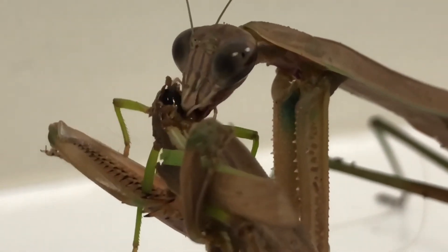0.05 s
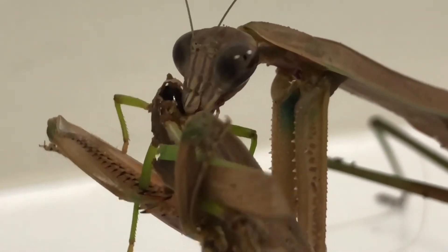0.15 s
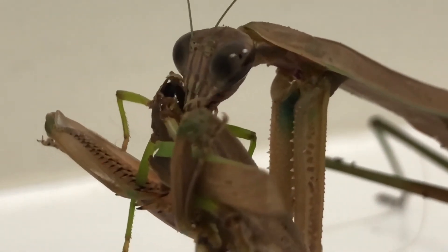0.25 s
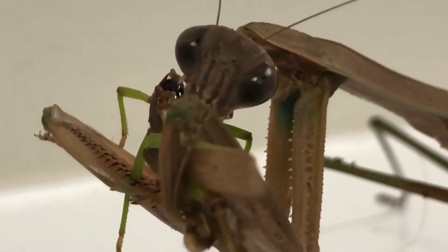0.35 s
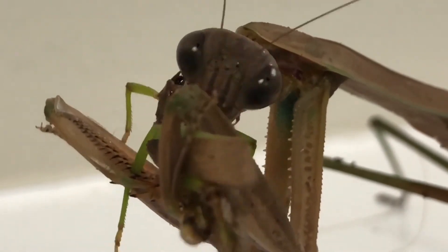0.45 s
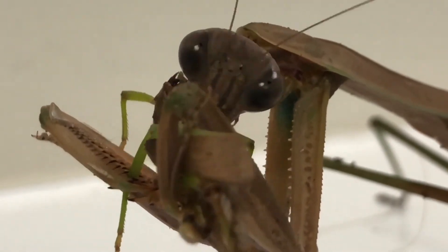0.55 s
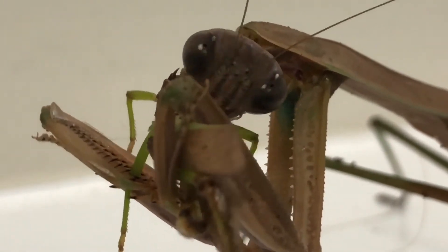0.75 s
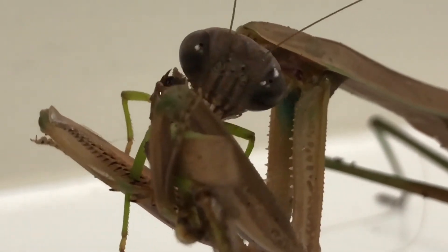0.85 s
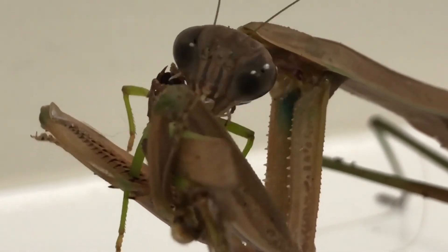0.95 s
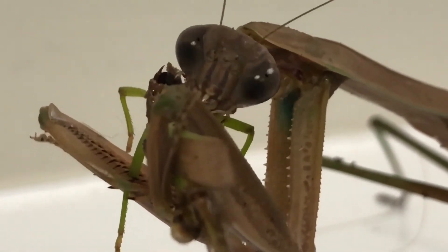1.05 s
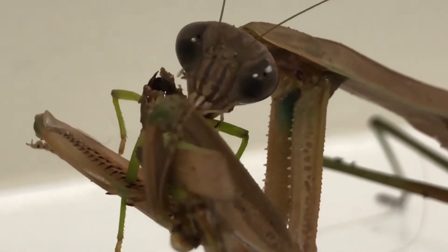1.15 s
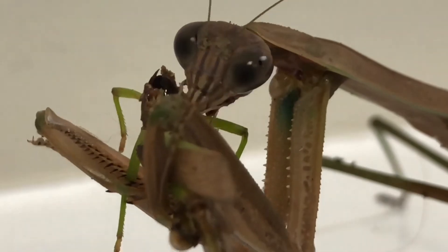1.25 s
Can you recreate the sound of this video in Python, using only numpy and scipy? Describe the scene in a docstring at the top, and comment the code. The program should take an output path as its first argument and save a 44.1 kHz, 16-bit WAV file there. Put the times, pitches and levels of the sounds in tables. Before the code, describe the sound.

An insect's shell crunches and cracks sharply as a mantis bites it, then faint clicks.

```python
"""A mantis bites into a grasshopper, close by, in a small hard-walled enclosure.
Under the jaws the shell crunches in swarms of tiny snaps, then gives way in one sharp crack that
excites its resonances. Legs and shell tap as damped oscillators, and thin snips of the jaws follow.
Reflections from the walls ring on briefly; a faint electric whine and hiss lie underneath."""
import sys
import numpy as np
from scipy import signal
from scipy.fft import rfft, irfft, next_fast_len
from scipy.io import wavfile
from scipy.ndimage import map_coordinates

SR = 44100
rng = np.random.default_rng(int(sys.argv[2]) if len(sys.argv) > 2 else 0)


def file_out(sig):
    """Save sig as 16-bit WAV at sys.argv[1]."""
    # one column per channel
    cols = np.atleast_2d(sig).T
    # limit, then scale
    lim = np.clip(cols, -1, 1)
    pcm = np.round(lim * 32767).astype(np.int16)
    wavfile.write(sys.argv[1], SR, pcm)


N = 57330

# partials of the electric whine (frequency [Hz], rms level [dB])
WHINE_PARTIALS = [(473.7, -80.5), (958.2, -73.5), (1427, -66.5), (1922, -71), (2379, -74.5), (2853, -75.5),
                  (3806, -75), (4280, -91.5), (8646, -93.5), (9604, -98.5), (10567, -98), (11526, -84.5)]
# spectrum of the hiss (frequency [Hz], relative level [dB])
HISS_SPECTRUM = [(100, -9.5), (300, -5), (420, -3.5), (700, -4.5), (1200, 1), (1700, -2.5), (3200, 0.5),
                 (4300, -5.5), (6000, -11), (10000, -15), (15500, -16)]
# spells of crunching (time [s], duration [s], level [dB], treble gain [dB])
CRUNCH_SPELLS = [(0, 0.028, -57.5, -1), (0.06, 0.011, -54, 3.5), (0.078, .03, -60.5, 1),
                 (0.113, 0.035, -61, 1), (0.1874, 0.0031, -51.5, -10), (0.193, 0.017, -56, -5),
                 (.212, 0.0055, -49, -3), (0.2177, 0.0074, -43.5, -7), (0.237, .013, -49, 0),
                 (0.388, 0.016, -60, -33), (0.4507, 0.0053, -53, -3), (0.456, 0.015, -56.5, -0.5),
                 (0.472, 0.014, -60, -9), (0.623, .005, -70, 8), (.692, 0.0037, -71, 19),
                 (.74, 0.35, -84, 8.5), (0.96, 0.01, -69.5, 9.5)]
# spectrum of the crunching (frequency [Hz], relative level [dB])
CRUNCH_SPECTRUM = [(150, -34), (300, -19), (550, -6.5), (1200, -4.5), (1650, -4), (2400, 1.5), (3800, -0.5),
                   (5500, -9.5), (8000, -10.5), (15500, -10.5)]
# taps of legs and shell (time [s], level [dB], frequency [Hz], T60 [s])
TAPS = [(.005, -63.5, 567, 0.081), (0.149, -63, 408, 0.067), (0.187, -44.5, 2510, 0.012),
        (0.22, -42, 1270, .04), (.221, -54, 718, 0.03), (0.234, -35, 2478, 0.032), (.438, -65, 450, 0.076),
        (.456, -59.5, 558, 0.095), (.479, -53.5, 1264, 0.051), (0.5222, -54, 440, 0.017),
        (.523, -50, 1084, .015), (1.1113, -44, 460, 0.012), (1.111, -46, 734, 0.036),
        (1.1585, -47, 392.6, 0.06), (1.1590, -47, 648, .02), (1.2135, -45.5, 3650, 0.034),
        (1.228, -57, 820, 0.039), (1.277, -50.5, 890, 0.07)]
# fractures that make up the crack (time [s], relative level [dB])
FRACTURES = [(0.256, -7.5), (.2571, -4.5), (.2579, -1.5)]
# resonances of the breaking shell (frequency [Hz], bandwidth [Hz], relative gain [dB])
SHELL_RESONANCES = [(815, 550, -8), (1960, 210, 3), (2830, 530, -2.5), (3560, 320, -1)]
# spectrum of the splintering (frequency [Hz], relative level [dB])
SPLINTER_SPECTRUM = [(100, -2.5), (330, -19), (560, 1), (900, 1), (1500, -4.5), (2300, 1), (4000, 1),
                     (5200, -2.5), (7300, -9.5), (10800, -5), (13000, -6.5), (15000, -9), (16000, -5.5)]
# modes that the crack sets ringing (frequency [Hz], level [dB], T60 [s])
RING_MODES = [(386, -52, .13), (548, -43, .12), (684, -49, .11), (880, -45, .08), (1878, -38, .08),
              (2022, -31, .08), (2190, -45, .17), (2428, -40, .09), (2648, -39, .1), (2757, -33, .1),
              (2826, -42, .16), (3075, -42, .13), (3552, -38, .1), (3725, -39, .15), (4000, -40, .09)]
# snips of the jaws (time [s], level [dB], centre frequency [Hz], bandwidth [Hz], T60 [s])
SNIPS = [(0.8655, -46.5, 5950, 2000, 0.032), (0.868, -56.5, 7450, 2570, 0.046),
         (1.0146, -53, 8670, 1100, 0.044), (1.0151, -47.5, 4200, 2900, .012),
         (1.111, -53.5, 5500, 13800, 0.02), (1.1578, -44.5, 2300, 1230, 0.01),
         (1.1579, -48.5, 9300, 12000, 0.012), (1.207, -64, 7100, 5100, 0.064),
         (1.217, -55.5, 1700, 2000, 0.041), (1.282, -53.5, 2200, 1400, .04)]
# reverberation time of the enclosure (frequency [Hz], T60 [s])
WALL_DECAY = [(300, 0.15), (1000, .11), (3000, 0.19), (7000, 0.16), (15000, 0.15)]
# bass roll-off of the microphone (frequency [Hz], gain [dB])
MIC_RESPONSE = [(25, -42.5), (100, -28), (200, -22), (280, -17), (330, -13), (380, -2.5), (500, -1)]


def amp(db):
    """Decibels to amplitude ratio."""
    return 10 ** (np.asarray(db) / 20)


def unit_rms(x):
    """Normalisation to unit power."""
    return x / np.sqrt(np.mean(x ** 2) + 1e-20)


def along(points, hz):
    """Interpolation of (frequency [Hz], value) points on a logarithmic axis."""
    freqs, values = np.transpose(points)
    return np.interp(np.log(hz + 1), np.log(freqs + 1), values)


def since(start):
    """Seconds elapsed since start, zero before it."""
    return np.maximum(np.arange(N) / SR - start, 0)


def decay(t, t60):
    """Exponential decay, 60 dB in t60 seconds, starting when t leaves zero."""
    return (t > 0) * np.exp(-np.log(1000) * t / t60)


def wobble(rate):
    """Spline interpolation through random knots, rate of them a second."""
    knots = rng.standard_normal(int(N * rate / SR) + 4)
    return map_coordinates(knots, [np.arange(N) * rate / SR])


def even_noise(window_s):
    """Short-time whitening: noise with a nearly flat spectrum in every window."""
    size = 2 ** round(np.log2(window_s * SR))
    noise = rng.standard_normal(N)
    for _ in range(3):
        spectra = signal.stft(noise, nperseg=size)[2]
        noise = signal.istft(spectra / (np.abs(spectra) + 1e-12), nperseg=size)[1][:N]
    return unit_rms(noise)


def filtered(x, response):
    """Linear filtering: the spectrum of x times a frequency response."""
    size = next_fast_len(2 * N)
    return irfft(rfft(x, size) * response(np.fft.rfftfreq(size, 1 / SR)), size)[:N]


def coloured(x, points, keep_power=True):
    """Minimum-phase filtering through (frequency [Hz], gain [dB]) points."""
    size = 2 ** 13
    gain = amp(along(points, np.fft.rfftfreq(size, 1 / SR)))
    cepstrum = irfft(np.log(unit_rms(gain) if keep_power else gain))
    cepstrum[1:size // 2] *= 2  # folding the cepstrum makes the filter causal
    cepstrum[size // 2 + 1:] = 0
    return signal.fftconvolve(x, irfft(np.exp(rfft(cepstrum))))[:N]


def whine_and_hiss(waver_db=0.5, hiss_db=-64.5):
    """Superposition: slightly amplitude-modulated electric partials over stationary noise."""
    t = since(0)
    whine = sum(amp(db + waver_db * wobble(7.6)) * np.sin(2 * np.pi * (hz * t + rng.random()))
                for hz, db in WHINE_PARTIALS)
    hiss = amp(hiss_db) * coloured(rng.standard_normal(N), HISS_SPECTRUM)
    return np.sqrt(2) * whine + hiss


def crunching(snaps_per_s=7000, spread_db=1.5, rise_s=0.0008, crossover_hz=4870):
    """Shot noise: each squeeze of the jaws sets off a swarm of tiny, randomly timed snaps."""
    body, treble = np.zeros(N), np.zeros(N)
    for start, duration, db, treble_db in CRUNCH_SPELLS:
        t = since(start)
        snaps = (rng.random(N) < snaps_per_s / SR) * rng.choice([-1, 1], N)
        strength = amp(spread_db * rng.standard_normal(N))
        envelope = (1 - np.exp(-t / rise_s)) * np.exp(-(t / duration) ** 4)
        spell = amp(db) * unit_rms(snaps * strength) * envelope
        body += spell
        treble += amp(treble_db) * spell
    lowpass = lambda f: 1 / (1 + (f / crossover_hz) ** 6)
    both_bands = filtered(body, lowpass) + filtered(treble, lambda f: 1 - lowpass(f))
    return coloured(both_bands, CRUNCH_SPECTRUM)


def enclosure(x, wet_db, room_db=-7, room_t60=0.21):
    """Reverberation: dense reflections off the near walls and the fainter room join the direct sound."""
    hz, t, spectra = signal.stft(even_noise(window_s=0.012), SR, nperseg=256)
    damping = decay(t, along(WALL_DECAY, hz)[:, None])
    walls = signal.istft(spectra * damping, SR, nperseg=256)[1][:N]
    room = rng.standard_normal(N) * decay(since(0), room_t60)
    impulse_response = (unit_rms(walls) + amp(room_db) * unit_rms(room)) / np.sqrt(N)
    return x + amp(wet_db) * signal.fftconvolve(x, impulse_response)[:N]


def taps(attack_s=0.00022, roughness_rad=0.4):
    """Damped oscillation: each tap of leg or shell rings one mode, roughened by phase modulation."""
    out = np.zeros(N)
    for start, db, hz, t60 in TAPS:
        t = since(start)
        phase = 2 * np.pi * hz * t + roughness_rad * wobble(hz / 2)
        out += amp(db) * np.sin(phase) * decay(t, t60) * (1 - np.exp(-t / attack_s))
    return out


def shell_response(f):
    """Resonance: the shell responds as parallel second-order resonators of alternating sign."""
    return sum((-1) ** k * amp(db) * 1j * f * width / (hz * hz - f * f + 1j * f * width)
               for k, (hz, width, db) in enumerate(SHELL_RESONANCES))


def crack(shell_gain_db=3.5, splinter_gain_db=-31.5, splinter_t60=0.039,
          ring_start_s=0.2568, ring_attack_s=0.002):
    """Impulse excitation: quick fractures jolt the shell, splinter it and leave a hollow ring."""
    impulses, splinter_power = np.zeros(N), np.zeros(N)
    for start, db in FRACTURES:
        impulses[round(start * SR)] += amp(db)
        # incoherent bursts add in power
        splinter_power += (amp(db) * decay(since(start), splinter_t60)) ** 2
    shell = amp(shell_gain_db) * filtered(impulses, shell_response)
    burst = np.sqrt(splinter_power) * even_noise(window_s=0.006)
    splinters = amp(splinter_gain_db) * coloured(burst, SPLINTER_SPECTRUM)
    t = since(ring_start_s)
    ring = sum(amp(db) * np.sin(2 * np.pi * (hz * t + rng.random())) * decay(t, t60)
               for hz, db, t60 in RING_MODES)
    ring *= 1 - np.exp(-t / ring_attack_s)
    return enclosure(shell, wet_db=-4.5) + enclosure(splinters, wet_db=1.5) + ring


def jaw_snips():
    """Band-limited noise: each snip is a decaying rasp around one centre frequency."""
    out = np.zeros(N)
    for start, db, hz, width, t60 in SNIPS:
        bandpass = lambda f: 1 / np.sqrt(1 + (2 * (f - hz) / width) ** 6)
        rasp = filtered(even_noise(window_s=0.006), bandpass)
        out += amp(db) * unit_rms(rasp) * decay(since(start), t60)
    return out


def scene():
    """Superposition: the sounds of the meal and their reflections add to the whine and hiss."""
    mix = crack() + enclosure(crunching(), wet_db=0.5)
    mix += whine_and_hiss()
    mix += enclosure(jaw_snips(), wet_db=-3.5)
    mix += enclosure(taps(), wet_db=-9)
    return mix[None]


def record(dry):
    """Band limiting: the microphone attenuates the bass, and nothing passes above the upper limit."""
    upper_limit_hz = 15750
    bass_cut = coloured(dry[0], MIC_RESPONSE, keep_power=False)
    return filtered(bass_cut, lambda hz: hz < upper_limit_hz)[None]


dry = scene()
out = record(dry)
file_out(out)
```